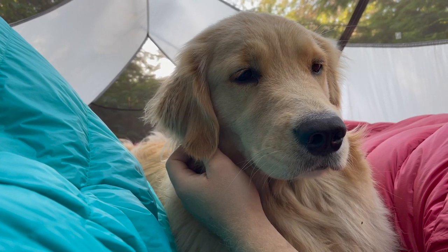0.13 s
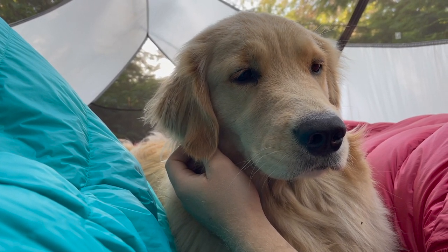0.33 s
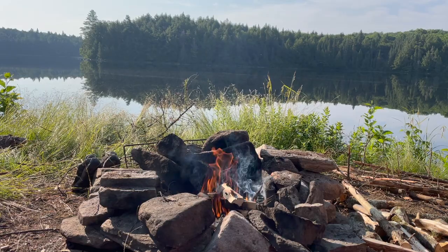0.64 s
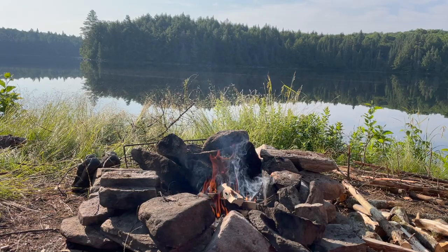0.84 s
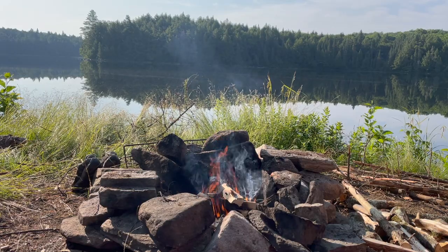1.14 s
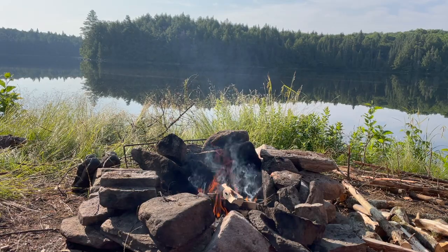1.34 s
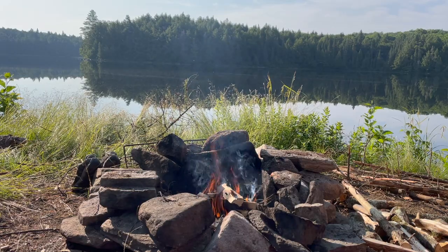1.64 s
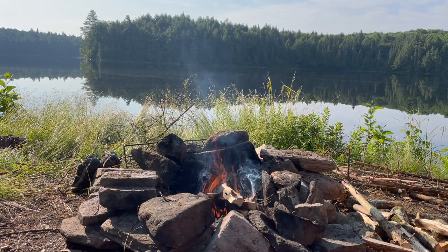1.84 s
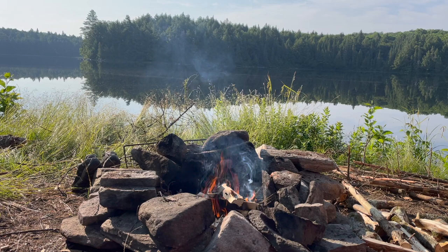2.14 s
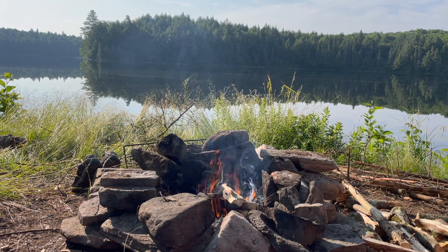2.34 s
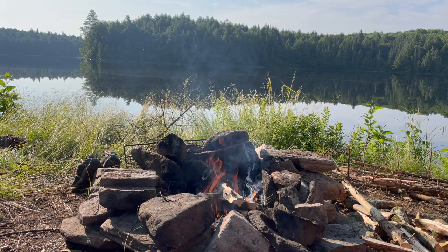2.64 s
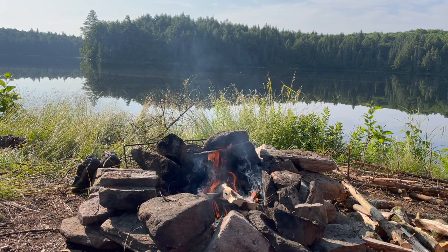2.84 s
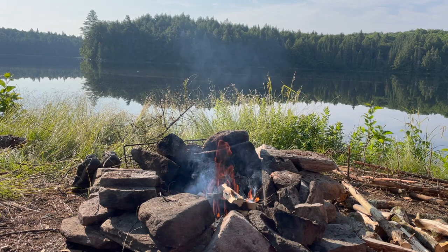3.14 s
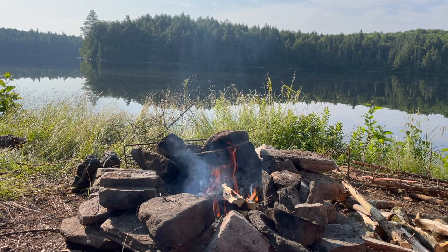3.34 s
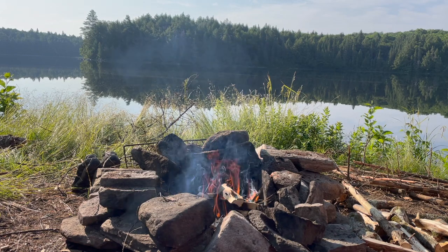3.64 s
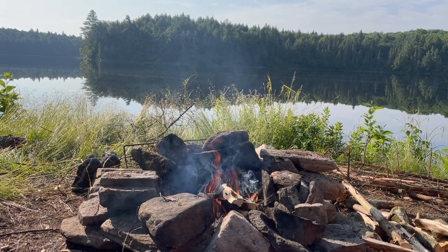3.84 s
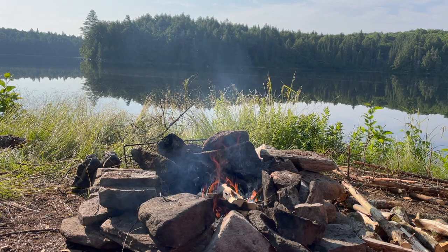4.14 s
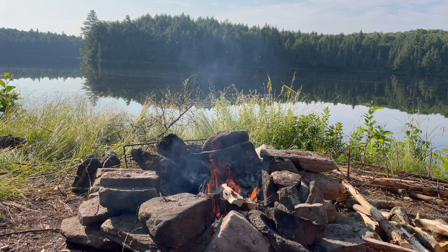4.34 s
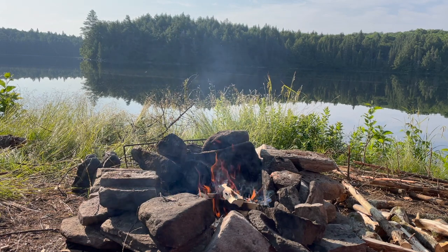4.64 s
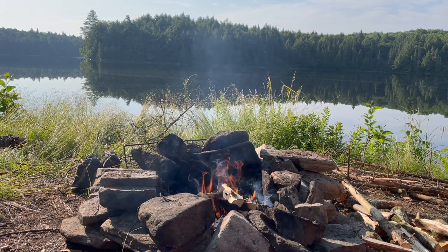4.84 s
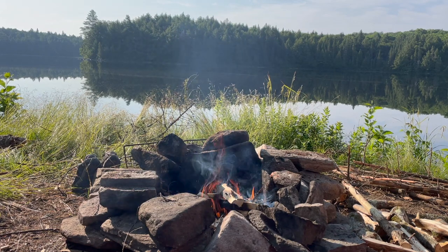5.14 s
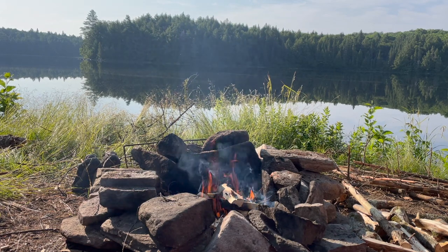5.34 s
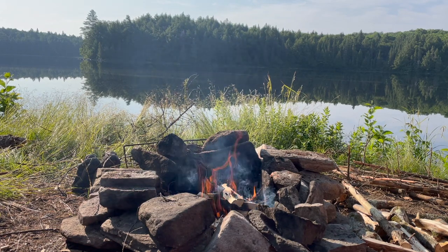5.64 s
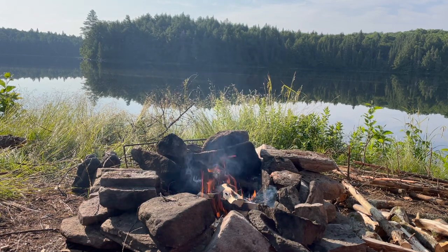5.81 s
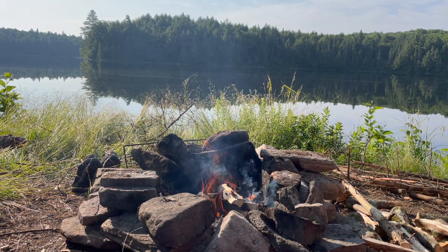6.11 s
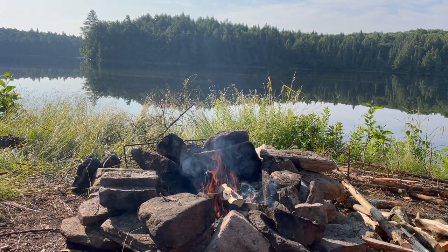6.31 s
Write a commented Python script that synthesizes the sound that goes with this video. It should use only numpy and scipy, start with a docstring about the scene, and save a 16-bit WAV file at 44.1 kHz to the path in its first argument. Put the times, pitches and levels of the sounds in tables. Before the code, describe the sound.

A barely audible, low tent hush with thin distant bird whistles lasts half a second, then switches quickly to a small wood fire outdoors. Crisp pops and tiny ticks come in irregular clusters, led by one huge crack soon after the change. Flames puff softly underneath, steam hisses after pops, and the woods return a short diffuse echo. Close stereo microphone; faint birds chirp again near the end.

```python
"""Campfire in the woods, after a moment in a tent.

Half a second of low tent noise crossfades to a small log fire. Steam bursts are pressure spikes,
partly scattered by logs and stones, then echoed by the trees as decaying diffuse noise.
Flames are puffing low noise; a low rumble swells after each pop and dies away, like a longer bass
echo from the woods. Vents add hissing noise to each pop.
Far birds are gliding sine whistles, blurred by the same kind of echo."""
import sys
import numpy as np
from scipy import signal
from scipy.fft import rfft, irfft, next_fast_len
from scipy.io import wavfile
from scipy.ndimage import map_coordinates

SR = 44100
rng = np.random.default_rng(int(sys.argv[2]) if len(sys.argv) > 2 else 0)


def put_to_file(sound):
    """Save the sound as 16-bit audio at rate SR, in the file named by the first command-line argument."""
    columns = np.atleast_2d(sound).T  # one column per channel
    safe = np.clip(columns, -1, 1)
    whole_steps = np.round(safe * 32767)
    wavfile.write(sys.argv[1], SR, whole_steps.astype(np.int16))


N = 285327
TIME_S = np.arange(N) / SR

# tent noise spectrum: f/Hz, relative density/dB
TENT_SPECTRUM = [(35, -23), (60, 0), (480, -17.5), (1860, -33), (2250, -29.5), (2650, -34.5), (3500, -35),
                 (3850, -29), (4120, -34), (16000, -49)]
# far bird whistles: t/s, length/s, start f/Hz, end f/Hz, level before the path/dB
WHISTLES = [(0.043, 0.19, 3670, 3750, -77.5), (0.217, 0.22, 3730, 3820, -74.5),
            (5.324, 0.085, 4990, 4470, -80.5), (5.409, 0.041, 5800, 5400, -74),
            (5.52, 0.12, 4860, 4500, -76), (5.612, 0.076, 6000, 5380, -70),
            (5.812, 0.055, 6250, 5450, -65.5), (6.222, 0.089, 6000, 5250, -61),
            (6.353, 0.13, 4460, 4170, -72.5), (6.407, 0.074, 4770, 5010, -62.5)]
# spectrum of the woods echo: f/Hz, relative level/dB
WOODS_SPECTRUM = [(60, 6.5), (300, 2.5), (900, 2.5), (2000, -2), (5000, -2.5), (7000, -1), (9000, -14),
                  (13000, -7), (16000, -6)]
# steam hiss spectrum: f/Hz, relative density/dB
HISS_SPECTRUM = [(400, 1.5), (1000, -0.5), (2000, -0.5), (3000, -2.5), (4500, -1), (6800, -4.5),
                 (8500, -20), (11000, -3.5), (13700, -0.5), (16000, -1.5)]
# spectrum of flames and low rumble: f/Hz, relative density/dB
FLAME_SPECTRUM = [(25, -20.5), (45, -5), (75, 3), (130, -1), (220, -8), (350, -19.5), (600, -25),
                  (1200, -39)]
# how hard the flames burn: t/s, level before gain_db/dB
FLAME_LEVEL = [(0.48, -62.5), (0.85, -60), (1.05, -67.5), (1.7, -64), (1.85, -57), (2.15, -59), (2.23, -73),
               (2.75, -75.5), (2.92, -59), (3.2, -59.5), (3.62, -75), (3.9, -60), (4.06, -88), (4.16, -67),
               (4.32, -74.5), (4.46, -60), (4.63, -69), (4.8, -63), (6.46, -61)]
# prominent pops: t/s, crack level/dB, then thump, wood and snap levels re crack/dB
POPS = [(0.4948, -22.5, 10.5, -1.5, -2.5), (0.5651, -18, 17.5, 8.5, 13), (0.596, -25, 15, -2, 9),
        (0.6235, -24.5, -1, 5, 3), (0.6366, -7, -3, 1, 7.5), (0.6755, -9.5, -3, -5, 7),
        (0.7112, -18.5, -24, -0.5, -2), (0.7481, -16, 1, -11.5, 5.5), (0.772, -9.5, -21, -5.5, 3.5),
        (0.7843, -18, 8, -5, 5.5), (0.7978, -15.5, -15, -17, 2), (0.816, -13.5, -12, 3.5, -28),
        (0.8241, -11, -4, -4, 0), (0.8633, 22, -2, 1, -7.5), (0.9284, -10.5, 4, -17, 9),
        (1.2136, -21, 3, 1.5, 1.5), (1.3134, -36.5, 4.5, -9, 13), (1.5083, -33.5, 7, 6.5, 1),
        (1.5519, -7.5, -20, -7, -0.5), (1.5942, -14, -11, -2, 3), (1.662, -3, -5, -5, 5),
        (1.7012, -3.5, -7, -14, 2), (1.7948, 12, 11.5, 5, 4), (1.8752, -20.5, -9.5, -4, 8),
        (1.9136, -7.5, 20.5, 16, -1.5), (1.9646, -21.5, 22.5, 9, 2), (2.0352, 0, 11.5, 2.5, 4.5),
        (2.0831, -19, 4, 2, 0.5), (2.1091, -6, 16, 10.5, 10), (2.1431, -6, 7, 1.5, -4),
        (2.2257, -10, -11.5, -5.5, 11), (2.3127, -14.5, -5.5, -5.5, 8.5), (2.3347, -26.5, -13, 7, 1),
        (2.3695, -16, -25.5, -7.5, 6.5), (2.3743, -14, -21, -13, 0.5), (2.3983, -5, -41, -4, 2),
        (2.542, -13, -4.5, -9, 10), (2.5531, 11, -9, -1, -10), (2.6801, -21, 6, -11, -3),
        (2.7037, -23, -18, -4, 2), (2.7875, 8.5, -11.5, -4, 4), (2.8741, -6.5, 28, 5, -0.5),
        (2.883, -6.5, 11, -0.5, -5), (2.9354, -9.5, -26, -7, 5), (2.9619, -17.5, -28.5, 4.5, 1.5),
        (3.046, -18.5, -27, -11.5, 9), (3.067, -14, -7, -9.5, -4.5), (3.0967, -1.5, -3, -4, 2.5),
        (3.117, -16, 1, -2, -3), (3.1263, 8.5, -1, 2.5, -3), (3.1644, 12, 9.5, 6.5, -4),
        (3.2014, -11, 5.5, -13, 0), (3.2133, -14.5, 8, -12, 0), (3.2478, -11.5, -23, -1.5, 6),
        (3.2549, -15.5, -11, -3.5, 3.5), (3.32, -23.5, -5, 1, -15), (3.3386, -18.5, -12, -4.5, -1),
        (3.3555, -20.5, 2.5, -17, -13), (3.4004, -22.5, 0, 2, -18), (3.4458, -23, -3, -3.5, 3),
        (3.5054, -8.5, -6.5, -6.5, 4.5), (3.5335, -42.5, 30.5, 12.5, -2), (3.6495, -15, -30, -1.5, -6),
        (3.672, -15, -24.5, -4, -6), (3.734, -15.5, -6, -10.5, 10.5), (3.7536, -6.5, -12, -1.5, -4),
        (3.8289, -2, 2.5, 4.5, -10), (3.9338, -22.5, -6.5, -1, 6.5), (4.0522, -13, -13, 0.5, 8.5),
        (4.1523, -7.5, 2, 5, -3), (4.2122, -19, -25, 0.5, -8.5), (4.2883, -11.5, -14.5, -2, 3),
        (4.4206, -10.5, 1, 4, 3), (4.4513, -15.5, -7, 0.5, -3), (4.4996, -22.5, 7, -3, 0),
        (4.5396, 2, -8.5, 0, -4), (4.5884, -10, -5, -8, 12.5), (4.6218, -21, -4, -4.5, -0.5),
        (4.7586, -26, -3.5, -3, -9), (4.9048, -11.5, 2.5, 1, -3), (4.968, -20.5, -13.5, -5.5, 5.5),
        (4.976, -13.5, -13, -15.5, 9.5), (5.0377, -28.5, 9, -7, -6), (5.1121, -10.5, 16, 7, 13.5),
        (5.2804, -26.5, 0, -8, 1), (5.3281, -12, -9.5, -1.5, -1.5), (5.3449, -20, 1, -3, -4),
        (5.4042, -25.5, -8, -1.5, 4.5), (5.4843, -20, -17.5, -5, 9), (5.496, -18, -13, -3, -17),
        (5.512, -26.5, 9.5, -6, 7.5), (5.5901, -10.5, 10.5, -11, 8), (5.6302, -18.5, -4.5, -18, -0.5),
        (5.7103, -12.5, 17, 1, 2.5), (5.7893, -24, -6, -6, 11), (5.8465, -17.5, -9.5, -21, -3),
        (5.865, -17.5, 8, -11, 10.5), (5.8965, -15, -15, 0, 3.5), (5.903, -30, 17.5, 22.5, -11.5),
        (5.9545, -20, -19, 9, -7), (6.0474, 18.5, 5, -6.5, -0.5), (6.1297, -14.5, 2, 6, 10),
        (6.2255, -14.5, -4.5, -12.5, -4.5), (6.2542, -11, -16, -9, 1), (6.3034, -18.5, -1, -11, 7.5),
        (6.4629, -9.5, -7.5, -15.5, 0)]
# mean colour of a burst: f/Hz, level/dB
POP_COLOUR = [(400, -10), (1100, -14), (1600, -9), (2050, -5.5), (2800, -9), (4200, -1.5), (5700, -6),
              (6600, -4), (7900, -6.5), (9200, -4.5), (11500, -4.5), (13700, -1), (15700, -3.5),
              (16800, -21.5)]
# phase between two microphone ports, for bursts: f/Hz, left lead/rad
PORT_PHASE = [(50, 0), (800, .3), (2000, .4), (3100, 1.2), (5100, 1.3), (5900, -1.5), (6800, -.4),
              (7600, -2.8), (9100, -3.5), (12800, -5.9), (15500, -6.6)]

POP_S, POP_CRACK_DB, POP_THUMP_DB = np.transpose(POPS)[:3]


def from_db(db):
    """Decibels to gain."""
    return 10 ** (np.asarray(db) / 20)


def rms_one(x):
    """Scale to rms 1 over all channels."""
    return x / np.sqrt(np.mean(x ** 2) + 1e-20)


def unit_energy(x):
    """Scale each channel to energy 1."""
    return x / np.sqrt(np.sum(x ** 2, axis=-1, keepdims=True) + 1e-20)


def in_time(rows):
    """Interpolate a table at every sample."""
    return np.interp(TIME_S, *np.transpose(rows))


def at_hz(points, hz):
    """Interpolate a table on a log-frequency axis."""
    f, value = np.transpose(points)
    return np.interp(np.log(hz + 1), np.log(f), value)


def add(out, sound, start_s):
    """Mix a stereo sound in at a time."""
    start = int(np.clip(round(start_s * SR), 0, N - 1))
    out[:, start:start + sound.shape[1]] += sound[:, :N - start]


def coloured(x, spectrum):
    """Filter to a spectrum in the frequency domain."""
    length = x.shape[-1]
    size = next_fast_len(length)
    gain = from_db(at_hz(spectrum, np.fft.rfftfreq(size, 1 / SR)))
    return irfft(rfft(x, size) * gain, size)[..., :length]


def diffuse(spectrum, alike_hz, size=N):
    """Stereo noise of rms 1, alike in both channels in the bass and unrelated in the treble."""
    mid, side = rng.standard_normal((2, size))
    high_pass = signal.butter(1, alike_hz, "high", fs=SR, output="sos")
    side = signal.sosfilt(high_pass, side)
    return rms_one(coloured(mid + side * [[1], [-1]], spectrum))


def drift(per_s):
    """Smooth random wander of rms 1, per_s knots a second."""
    knots = rng.standard_normal(1000)
    return rms_one(map_coordinates(knots, [TIME_S * per_s], order=2, mode="mirror"))


def after_pops(levels_db, release_s):
    """Envelope that gains power at each pop, then dies away exponentially."""
    power = np.zeros(N)
    power[np.clip((POP_S * SR).astype(int), 0, N - 1)] = from_db(levels_db) ** 2
    return np.sqrt(signal.lfilter([1], [1, -np.exp(-2 / (release_s * SR))], power))


def tent_hush(level_db=-64.5):
    """Steady, mostly low noise inside the tent."""
    return from_db(level_db) * diffuse(TENT_SPECTRUM, alike_hz=900)


def woods_echo(x, echo_db=-28.5, t60_s=0.36, rise_s=.008, size=32768):
    """Countless trunks and the ground return a smooth echo that dies within half a second."""
    t_s = np.arange(size) / SR
    envelope = from_db(-60 * t_s / t60_s) * (1 - np.exp(-t_s / rise_s))
    echo = unit_energy(diffuse(WOODS_SPECTRUM, alike_hz=900, size=size) * envelope)
    return from_db(echo_db) * signal.fftconvolve(x, echo, axes=1)[:, :N]


def birds(waver=0.083):
    """Thin gliding whistles, each swelling and fading, blurred by the trees on their way."""
    whistles = np.zeros((2, N))
    wander = waver * drift(140)  # fraction of the glide
    for start_s, length_s, start_hz, end_hz, level_db in WHISTLES:
        progress = np.linspace(0, 1, int(length_s * SR))
        hz = start_hz + (end_hz - start_hz) * (progress + wander[:len(progress)])
        swell = np.sqrt(np.abs(np.sin(np.pi * progress)))
        tone = np.sin(2 * np.pi * np.cumsum(hz) / SR) * swell
        add(whistles, from_db(level_db) * np.array([tone, tone]), start_s)
    return .65 * whistles + woods_echo(whistles, echo_db=-11.0)


def hiss(steady_db=-77.5, vent_db=-63.5, vent_db_per_crack_db=.3, release_s=0.028):
    """Steam seeps steadily out of the logs, and faster from each fresh crack."""
    vents = after_pops(vent_db + vent_db_per_crack_db * POP_CRACK_DB, release_s)
    return np.hypot(from_db(steady_db), vents) * diffuse(HISS_SPECTRUM, alike_hz=1500)


def flames_and_rumble(gain_db=1.5, puff_db=3.5, rumble_db=-63, rumble_db_per_thump_db=.75,
                      release_s=0.042):
    """Burning gas puffs as flame tongues tear off; a low rumble swells after each pop and dies away."""
    # the rumble is like a longer bass echo from the woods
    thump_db = POP_CRACK_DB + POP_THUMP_DB
    rumble = after_pops(rumble_db + rumble_db_per_thump_db * thump_db, release_s)
    puffs = rms_one(from_db(puff_db * drift(36)))
    burn = from_db(in_time(FLAME_LEVEL) + gain_db)
    return np.hypot(burn, rumble) * puffs * diffuse(FLAME_SPECTRUM, alike_hz=894.4)


def ember_ticks(least_db=-41.0, spread_db=2.5, most_db=-30.0, wake_s=0.07, loose_share=0.21,
                first_loose_s=0.62, thump_db=-7.0, wood_db=-3.0, snap_db=5.0, count=330):
    """Tiny bursts, most in the wake of a pop and the rest at any time, in rows like POPS."""
    pick, dice = rng.random((count, 3)), rng.standard_normal((count, 3))
    parent = (pick[:, 0] * len(POPS)).astype(int)
    in_wake_s = POP_S[parent] + wake_s * np.abs(dice[:, 0])
    loose_s = first_loose_s + pick[:, 0] * (N / SR - first_loose_s)
    when_s = np.where(pick[:, 2] < loose_share, loose_s, in_wake_s)
    crack_db = np.minimum(least_db - spread_db * np.log(1 - pick[:, 1]), most_db)
    rows = np.column_stack([when_s, crack_db, np.full(count, thump_db),
                            wood_db + 4 * dice[:, 1], snap_db + 4 * dice[:, 2]])
    return rows[when_s < N / SR]


def scattered_share(crack_db, small_share=0.39, big_share=0.84, big_from_db=9, big_full_db=15):
    """A small burst is mostly a clean spike; a big one tears the wood and rattles."""
    bigness = np.clip((crack_db - big_from_db) / (big_full_db - big_from_db), 0, 1)
    return small_share + (big_share - small_share) * bigness


def burst_path(hz, low_cut_hz=45, lead_s=.003, lag_cycles=1.05):
    """Response shared by all bursts: colour, late bass, low cut and port phases."""
    # bass lags by about a cycle: a strong pop ends in a short falling thump
    cycles = lag_cycles * np.log((hz + 25) / (hz + 3000)) + hz * lead_s
    lag = np.exp(-2j * np.pi * cycles)
    # two cascaded second-order high-passes
    low_cut = hz ** 4 / (hz ** 2 - np.sqrt(2) * 1j * hz * low_cut_hz - low_cut_hz ** 2) ** 2
    ports = np.exp(.5j * at_hz(PORT_PHASE, hz) * [[1], [-1]])
    return from_db(at_hz(POP_COLOUR, hz)) * lag * low_cut * ports


def bursts(rows, rattle_s=0.002, stones_s=0.008, stones_db=-14.5, apart=0.62,
           hollow_s=.00172, hollow_gain=0.2, lead_s=.003, size=4096):
    """Pressure spikes scattered by logs and stones; returns near sound and sound sent to the trees."""
    hz, t_s = np.fft.rfftfreq(size, 1 / SR), np.arange(size) / SR
    path = burst_path(hz, lead_s=lead_s)
    decay = np.exp(-t_s / rattle_s) + from_db(stones_db) * np.exp(-t_s / stones_s)
    decay = decay * (t_s > .0003)
    near, outward = np.zeros((2, N)), np.zeros((2, N))
    for start_s, crack_db, thump_db, wood_db, snap_db in rows:
        colour = [(380, thump_db), (700, min(thump_db, wood_db + 6.0)), (1150, wood_db),
                  (2000, wood_db), (3600, 0.0086), (7000, 0), (11000, snap_db)]
        gain = from_db(crack_db + at_hz(colour, hz)) * path
        # the hollow between logs and stones returns one dull, inverted reflection
        delay_s = hollow_s * rng.uniform(.9, 1.1)
        reflection = -hollow_gain * np.exp(-2j * np.pi * hz * delay_s) / (1 + 1j * hz / 7000)
        # the two ports hear slightly different scatter
        noise = rng.standard_normal((3, size))
        scatter = rfft(unit_energy((noise[0] + apart * noise[1:]) * decay))
        # long waves bend round the logs unscattered
        share = np.clip(scattered_share(crack_db), .02, .95) * hz ** 2 / (hz ** 2 + 800 ** 2)
        spike_and_scatter = np.sqrt(1 - share) + np.sqrt(share) * scatter
        add(near, irfft(gain * spike_and_scatter * (1 + reflection)), start_s - lead_s)
        # the more a burst scatters, the more it sends to the trees
        add(outward, irfft(gain * (share + 0.42)), start_s - lead_s)
    return near, outward


def scene(leave_tent_s=0.458, fade_s=0.036):
    """Tent noise crossfades to flames, rumble and hiss; bursts and birds are not faded."""
    outside = np.clip((TIME_S - leave_tent_s) / fade_s + .5, 0, 1)
    pops, to_trees = bursts(np.vstack([POPS, ember_ticks()]))
    background = np.sqrt(1 - outside) * tent_hush() + birds() + woods_echo(to_trees)
    fire = np.sqrt(outside) * (hiss() + flames_and_rumble())
    return background + fire + pops


def record(dry, ceiling=0.64, cutoff_hz=16600):
    """Soft overload of the loudest cracks, then a steep elliptic low-pass."""
    overloaded = ceiling * np.tanh(dry / ceiling)
    low_pass = signal.ellip(12, .2, 95, cutoff_hz, fs=SR, output="sos")
    return signal.sosfilt(low_pass, overloaded)


dry = scene()
out = record(dry)
put_to_file(out)
```